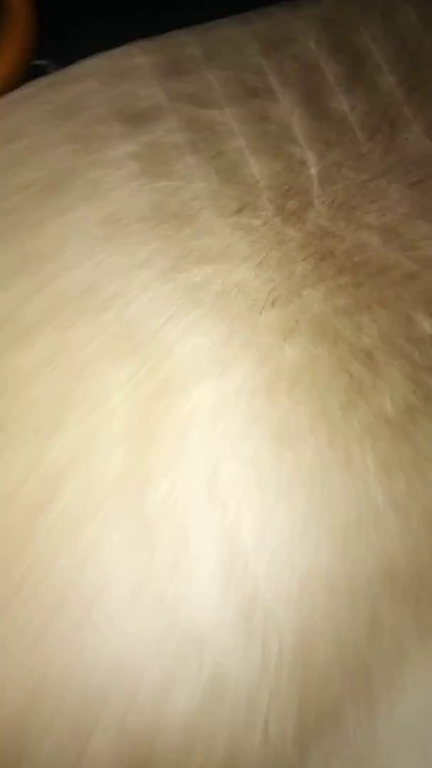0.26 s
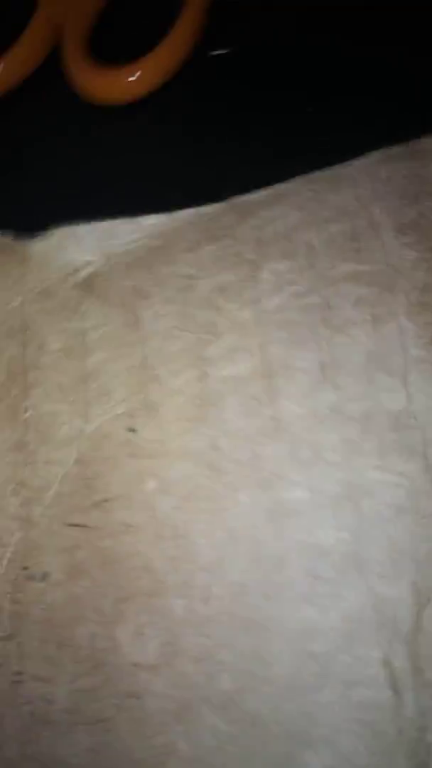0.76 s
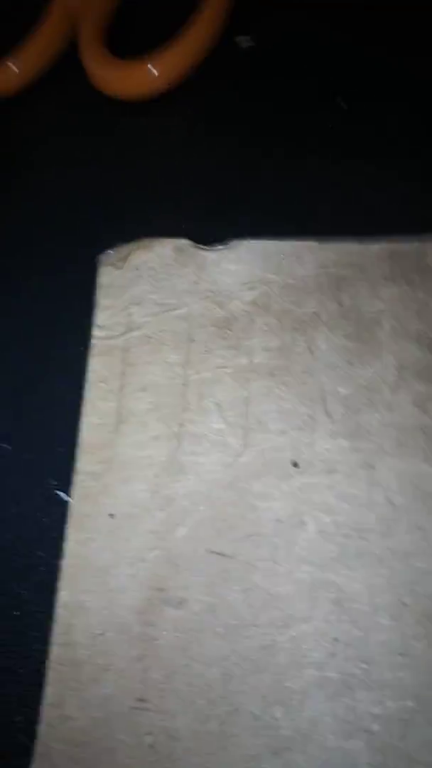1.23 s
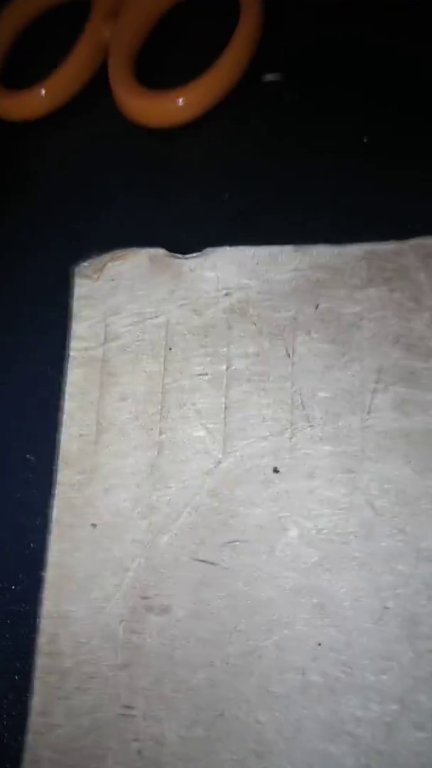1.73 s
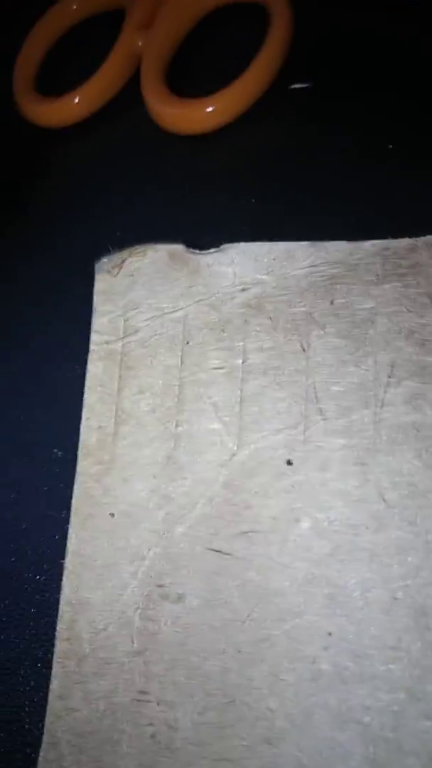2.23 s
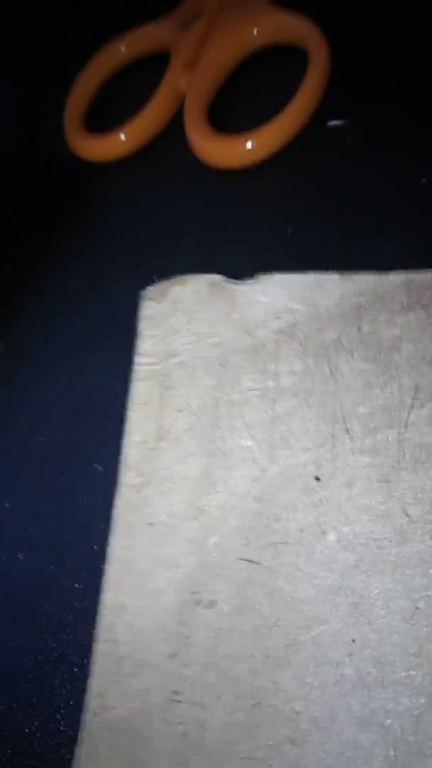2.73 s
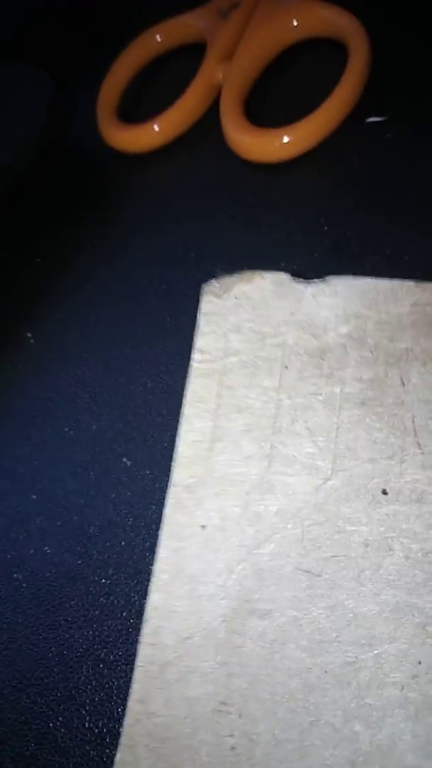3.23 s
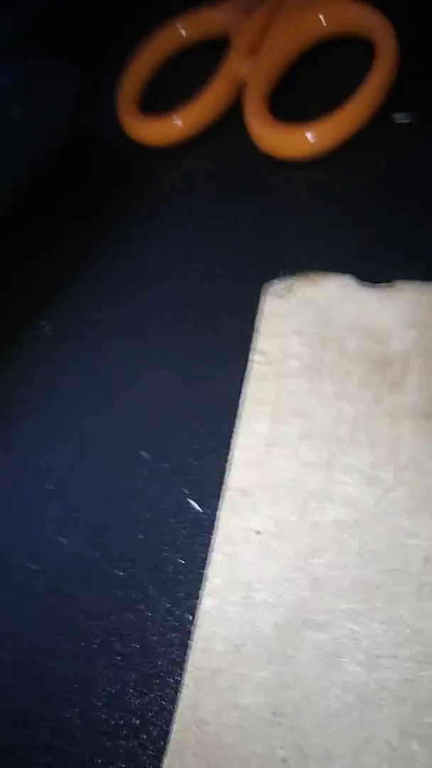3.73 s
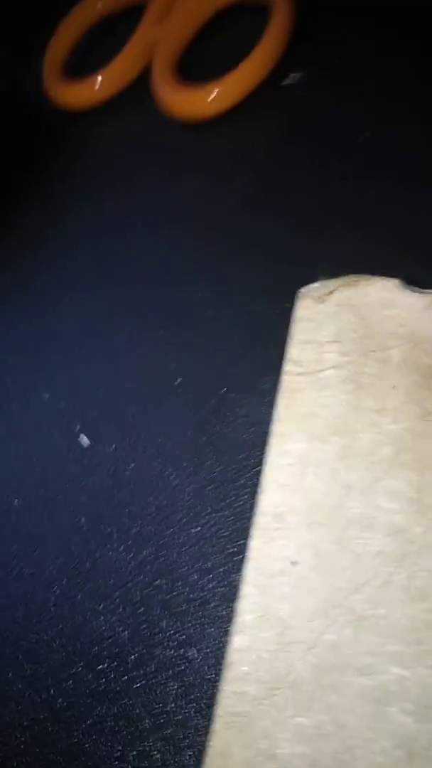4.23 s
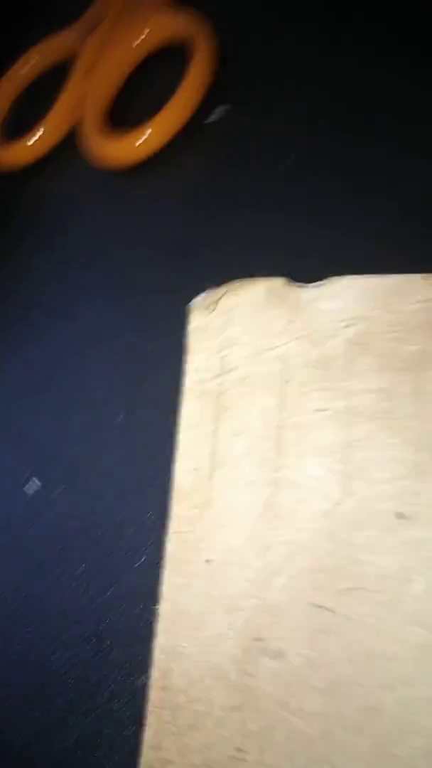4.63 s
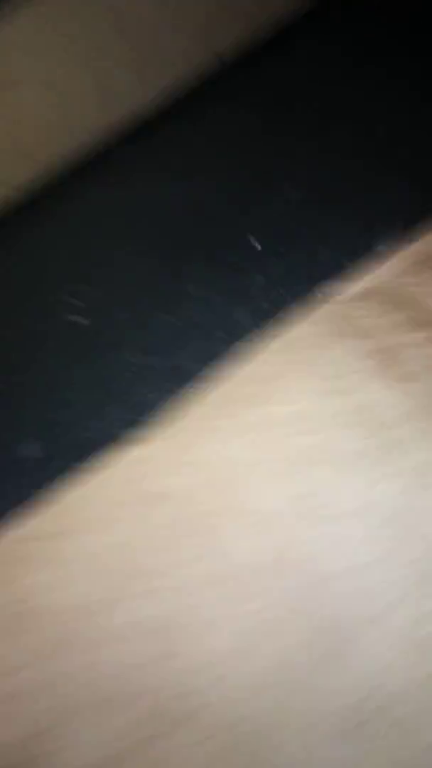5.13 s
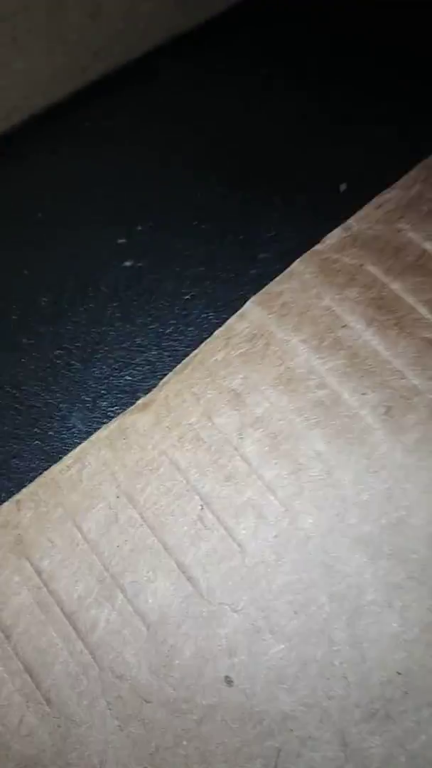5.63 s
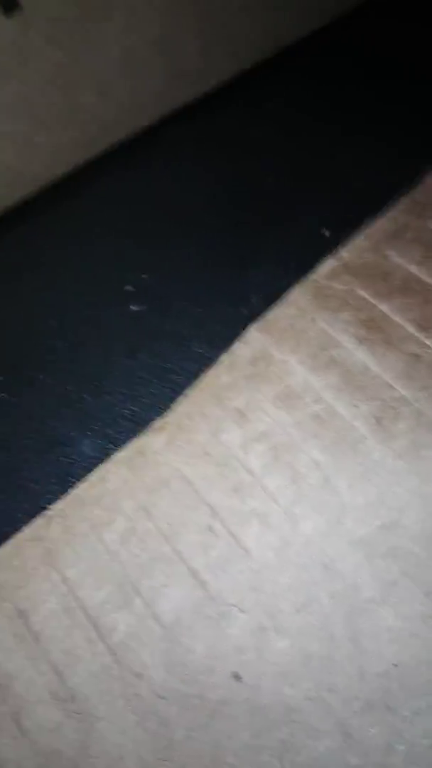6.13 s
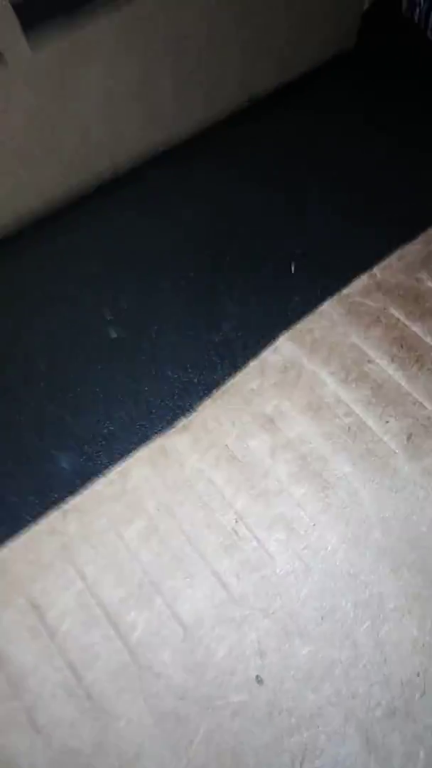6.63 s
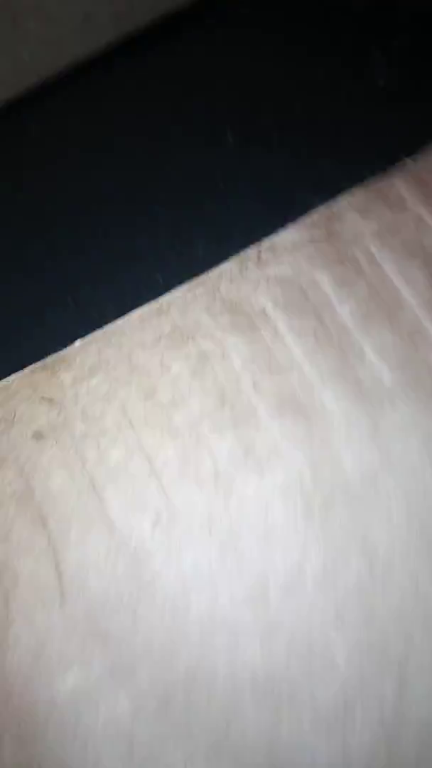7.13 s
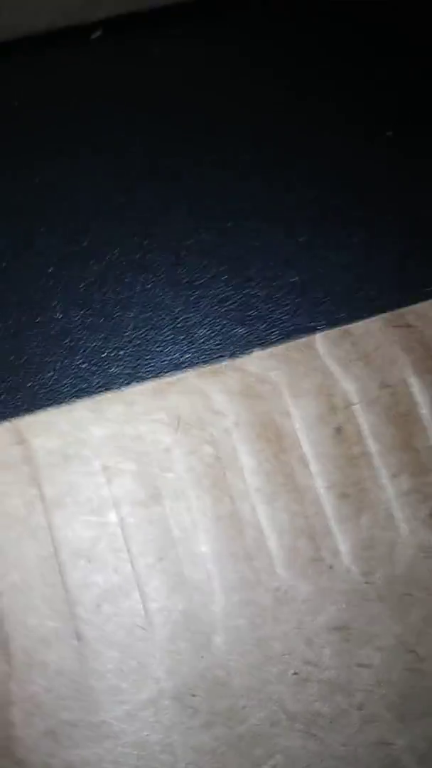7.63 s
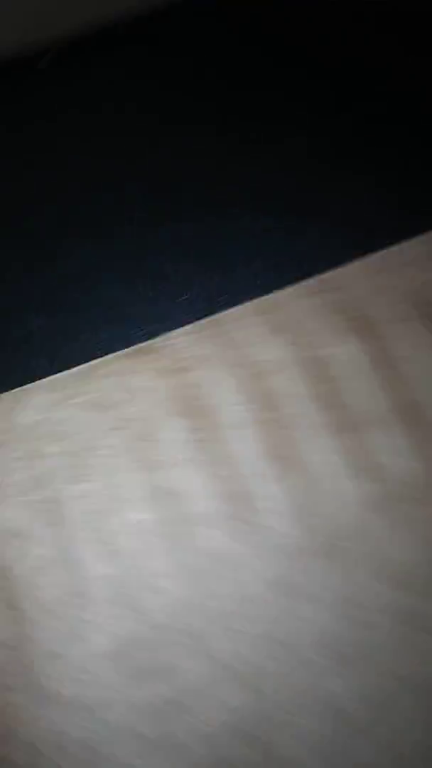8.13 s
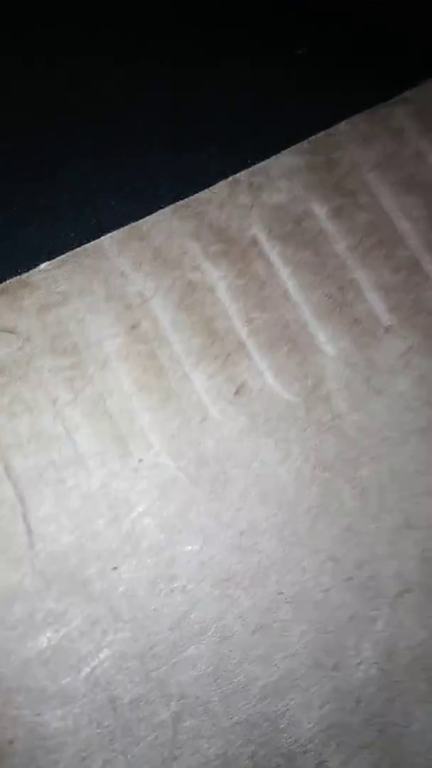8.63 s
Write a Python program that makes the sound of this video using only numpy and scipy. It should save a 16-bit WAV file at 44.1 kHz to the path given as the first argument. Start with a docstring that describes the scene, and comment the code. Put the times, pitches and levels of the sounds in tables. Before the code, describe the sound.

Hands tear and handle a paper envelope at close range, with crackling, rustling swishes and sharp crease snaps.

```python
"""A brown paper envelope, handled close to the microphone in a quiet room. It is picked up, torn (0.7 s),
rubbed hard twice, scuffed and scraped; it slides, its open pocket ringing hollow (3 s), is turned over
(4.4 s), swishes three times (5.7 s) and rests in the fingers (6.5 s). Throughout, fibres and creases slip
in showers of tiny clicks that the sheet colours, and single creases snap over and ring at their own pitch.
The loudest moments overload the recorder."""
import sys
import numpy as np
from scipy import signal
from scipy.fft import rfft, irfft
from scipy.io import wavfile
from scipy.ndimage import uniform_filter1d, map_coordinates

SR = 44100
rng = np.random.default_rng(int(sys.argv[2]) if len(sys.argv) > 2 else 0)


def transcribe(u):
    """Save the signal u as a 16-bit wav file named by the first command-line argument.

    u: samples, shape (n,) or (channels, n), limited to [-1, 1]; the rate is SR.
    q: integer samples, one column per channel.
    """
    v = np.clip(np.atleast_2d(u).T, -1, 1)
    q = np.round(v * 32767).astype(np.int16)
    wavfile.write(sys.argv[1], SR, q)


N = 391147

# hand strokes: (full strength from [s], rise [s], hold [s], fall [s], crackle [dB], rustle [dB], flap [dB])
HAND_STROKES = [(0.101, 0.0056, 0.027, 0.0057, -42, -40.5, -43),
                (0.167, 0.0067, 0.045, 0.0083, -72, -34.5, -45.5),
                (0.289, 0.027, 0.0054, 0.013, -41, -30.5, -31),
                (0.349, 0.037, 0.017, 0.045, -41.5, -38, -44),
                (0.554, 0.16, 0.024, 0.24, -36.5, -33, -39.5), (.818, 0.074, 0, 0.12, -31, -36.5, -36.5),
                (0.994, .13, .14, 0.047, -12, -24.5, -33.5), (1.267, 0.068, 0.17, 0.015, -11, -16, -23.5),
                (1.452, .03, 0.14, .03, -19, -25, -27), (1.533, 0.0087, 0.038, 0.038, -10, -12.5, -23.5),
                (1.588, 0.02, 0.061, 0.06, -6, -11.5, -21),
                (1.847, 0.024, 0.0075, 0.064, -34.5, -26.5, -25), (1.913, 0.024, 0, 0.054, -39, -39, -27),
                (2.094, 0.084, 0.04, 0.077, -43, -35, -34), (2.161, 0.012, 0.061, 0.029, -36.5, -20.5, -34),
                (2.315, 0.053, 0.077, 0.15, -28, -32.5, -33.5),
                (2.545, 0.026, 0.067, 0.018, -18.5, -24.5, -27.5),
                (2.707, 0.085, 0.044, 0.047, -15.5, -20, -28.5),
                (2.771, 0.0095, 0.12, 0.015, -11.5, -17, -28.5),
                (3.023, 0.09, 0.076, 0.23, -21.5, -20.5, -26.5),
                (3.246, 0.015, 0.35, 0.089, -23, -22.5, -33.5),
                (3.643, 0.031, 0.17, 0.099, -21, -22.5, -31),
                (3.895, 0.049, 0.0074, 0.02, -17.5, -21.5, -40),
                (3.955, 0.063, 0.046, 0.1, -21, -19.5, -26), (4.204, 0.21, 0, 0.067, -24, -24, -36),
                (4.319, 0.031, 0.0065, 0.049, -22, -27.5, -45),
                (4.565, 0.014, 0.023, 0.05, -37.5, -32, -23.5),
                (4.653, 0.057, 0.096, .09, -40.5, -33.5, -40), (4.875, 0.012, 0, 0.12, -45, -35, -35),
                (5.086, 0.0097, 0.063, 0.045, -40, -29, -35), (5.408, 0.12, 0.06, .2, -36.5, -35, -65),
                (5.597, 0.11, 0.024, 0.16, -31, -26, -31), (5.766, 0.046, 0, 0.34, -23.5, -17.5, -19.5),
                (5.919, 0.062, 0.046, 0.15, -19, -17.5, -24.5),
                (6.19, 0.1, 0.0039, 0.17, -13.5, -12, -16.5), (6.441, 0.05, 0.026, 0.051, -21.5, -17, -23),
                (6.635, 0.0071, 0.0024, 0.047, -39, -16, -13), (7.207, .004, 0.014, 0.025, -40, -24, -41),
                (7.71, 0.078, 0.00066, 0.074, -40, -35.5, -45), (7.561, 0.015, 0.022, 0.018, -47, -42, -60),
                (7.983, 0.031, 0.23, 0.45, -48.5, -44.5, -46), (8.271, 0.061, 0, 0.17, -36.5, -33.5, -36.5),
                (8.436, 0.045, 0.011, 0.019, -37, -32, -35), (8.676, 0.014, 0.042, 0.0067, -30.5, -36, -41),
                (8.771, 0.11, 0.021, 0.11, -33.5, -33.5, -46)]
# held sheet between strokes: (time [s], crackle [dB], rustle [dB], flap [dB])
HELD_LEVELS = [(0, -80, -81, -70), (.25, -77, -55, -49), (.42, -51, -63, -48), (1.2, -32, -33.5, -56),
               (1.72, -53, -33, -43), (1.8, -52, -51, -49), (2.63, -73.5, -39.5, -46),
               (2.9, -22.5, -25, -42), (3.9, -51, -30.5, -32), (4.4, -46, -45, -45.5),
               (5.3, -47.5, -40, -42), (6.58, -52.5, -41.5, -43.5), (6.69, -36, -29, -28),
               (6.9, -46.5, -39.5, -46.5), (7.28, -41, -35.5, -35.5), (7.52, -49.5, -46, -57),
               (7.9, -54.5, -48.5, -48), (8.87, -49, -42, -44.5)]
# slip coarseness: (time [s], spread of click sizes [dB])
SLIP_SPREAD = [(0, 3.5), (.7, 3), (1.1, 6), (1.3, 2), (2.3, 5), (2.8, 4), (3.5, 2.5), (5.7, 4.5),
               (6.7, 1.1), (8.87, 4)]
# colour of sheet and microphone per grip: (until [s], [(frequency [Hz], relative level [dB])])
GRIP_COLOURS = [(.72, [(60, -19), (290, 2), (600, -14), (1200, -13), (2600, -15), (5500, 1), (15600, -15)]),
                (1.2, [(60, -16), (320, 1), (700, -21.5), (1400, -17), (2300, -21), (4700, -5), (7800, 3),
                (10800, -11), (15600, -16.5)]), (1.75, [(60, -9), (206, 0.5), (476, -6), (1560, -8),
                (2600, -11), (6600, -3), (8720, -7.5), (12100, -20), (15600, -20)]), (2.27, [(60, -11),
                (300, -5), (700, -3.5), (1400, -7.5), (2400, -21), (7500, -21), (15600, -43)]),
                (2.948, [(60, -18.5), (292, -7.5), (535, -8), (1250, -4), (1830, -7), (2320, -7),
                (5000, -7.5), (7000, 0), (15600, -23)]), (3.72, [(60, -14.5), (200, -11), (1400, -4),
                (1900, -10), (3600, -11), (5600, -6.5), (6900, -2), (8500, -6.5), (10300, -15.5),
                (15600, -20.5)]), (4.4, [(60, -16.5), (248, -5), (465, -6), (758, -0.5), (3060, -5.5),
                (3600, -13), (6600, -8), (15600, -31)]), (5.7, [(60, -22.5), (216, -4.5), (560, -5.5),
                (1200, 4), (2010, -4), (7240, -6), (15600, -29.5)]), (6.549, [(60, -28.5), (192, -6.5),
                (344, -4), (420, -1.5), (1260, -2), (3690, -9.5), (6750, -6), (15600, -28)]),
                (9, [(60, -33), (115, -9), (300, -2.5), (700, -6.5), (1560, -5), (2850, -14.5), (3300, -10),
                (3950, -14.5), (4600, -13), (7000, -13.5), (9570, -22.5), (15600, -35)])]
# resonance of the open pocket: (time [s], pitch [Hz], lift [dB])
POCKET_RESONANCE = [(3.0, 2900, 6.5), (3.2, 2560, 6), (3.4, 2500, 8.5), (3.6, 2320, 3), (3.8, 2600, 0.5)]
# creases snapping over: (time [s], tick [dB], panel pitch [Hz], panel [dB])
CREASE_SNAPS = [(0.12, -42, 2440, -31), (0.173, -53, 1150, -24.5), (0.2, -62, 1270, -23),
                (0.2887, -37, 5230, -26), (0.48, -34, 3200, -25), (0.489, -18, 7100, -19),
                (0.624, -18.5, 4900, -27), (0.732, -18, 5540, -30.5), (0.769, -20, 7000, -25),
                (0.801, -15.5, 7200, -28.5), (0.819, -13, 298, -16.5), (0.865, -11.5, 4800, -18),
                (0.905, -14, 7500, -17), (0.941, -3.5, 1350, -16.5), (0.961, 8.5, 675, -7),
                (1.881, -21.5, 6800, -12.5), (1.896, -22, 2770, -23), (1.912, -19, 7220, -18),
                (2.093, -32, 2330, -30), (2.3123, -12, 6560, -4), (2.327, -8, 1550, -17),
                (2.3409, 6, 1320, 3.5), (2.3992, -10, 6700, -4.5), (2.4139, -20, 7200, -11.5),
                (2.544, -15, 6960, -14), (2.6577, -18, 7000, -0.5), (2.9281, -7, 1004, 2),
                (2.955, -7, 6700, -13), (3.0993, -38, 390, -9), (3.722, -28, 700, -7.5),
                (3.852, -25, 610, -13), (3.8878, -12, 790, -9), (3.9513, -11, 770, -7.5),
                (3.985, -19, 247, -9.5), (4.0445, -20, 704, -6.5), (4.431, -20, 1490, -26.5),
                (4.565, -2, 1470, -8.5), (4.6, -40, 280, -26), (4.76, -21, 300, -16),
                (4.864, -5.5, 1116, 1.5), (5.0573, -24, 1180, -20.5), (5.1353, -20.5, 1150, -19),
                (5.229, -23, 2990, -18), (5.238, -34, 190, -18.5), (5.301, -50, 240, -27.5),
                (5.425, -34, 276, -13.5), (5.4637, -11, 1260, 7.5), (5.547, -20, 1200, -18),
                (5.7599, -21, 450, -18), (5.9172, -13, 790, -3), (5.94, -3, 1280, -9),
                (6.0668, -25, 770, -0.5), (6.241, -10, 6000, -14), (6.576, -42, 1470, -22),
                (6.62, -11, 2060, -10.5), (6.641, -17, 302, 4), (6.6598, -19, 1040, -6),
                (6.892, -43, 227, -18.5), (7.078, -27, 1620, -28), (7.151, -24, 3420, -25),
                (7.21, -35, 302, -23), (7.254, -45, 348, -19), (7.305, -35, 1200, -26),
                (7.685, -23, 3280, -23), (7.7168, -21, 4400, -15), (7.872, -25, 7600, -20),
                (7.952, -11.5, 7220, -8.5), (8.109, -30, 830, -23.5), (8.1763, -18, 4540, -19),
                (8.194, -37, 500, -25.5), (8.4214, -22, 300, -22), (8.4373, -4, 286, -13),
                (8.465, -17.5, 1700, -17), (8.479, -19, 450, -16.5), (8.5514, -32, 5060, -18),
                (8.581, -14, 4560, -9.5), (8.7035, -11, 5060, -12)]
# room noise: (frequency [Hz], relative level [dB])
ROOM_SPECTRUM = [(40, -4), (273, 2), (7560, -18), (15600, -23)]

SLIPS_PER_S = 1500
FIBRE_LOW_HZ, FIBRE_TOP_HZ, FIBRE_T60_CYCLES, FIBRE_RUB = 3320, 13500, 5.2, 1.31
FLAP_TOP_HZ, RUSTLE_TOP_HZ = 550, 2890
STROKE_DEPTH_DB = 20  # drop per rise or fall time
BEND_DB, BEND_S, BEND_WIDTH_HZ, POCKET_WIDTH_HZ = 3.5, .15, 264.4, 380
TICK_T60_S, TICK_LOW_HZ, THUD_GAIN, THUD_TOP_HZ = .013, 1390, .35, 924
PANEL_MAX_T60_S, PANEL_MAX_CYCLES, RATTLE_T60_S, RATTLE_BAND_RATIO = .025, 51, .39, 1.42
ROOM_DB, MIC_LOW_HZ, CLIP_LEVEL, TOP_HZ = -53.5, 75, .75, 15700


def crinkle():
    """One shower of slips makes fibres crackle, panels rustle, the sheet flap; larger parts ring longer."""
    crackle, rustle, flap = hand_gains()
    spread_db, = curves(SLIP_SPREAD)
    sizes = np.minimum(rng.exponential(size=N), 3.2) + .5 * walk(90)
    slips = (rng.random(N) < SLIPS_PER_S / SR) * undb(spread_db * sizes)
    finger_pressure = undb(1.5 * walk(11))
    out = sheet_colour(crackle * fibres(slips, spread_db), RUSTLE_TOP_HZ, SR)
    for gain, lo_hz, hi_hz, t60_s, skin_rub, flicker_db in (
            (rustle, FLAP_TOP_HZ, RUSTLE_TOP_HZ, .015, .6, 1.2), (flap, 0, FLAP_TOP_HZ, .04, .35, 2.0)):
        bursts = even_out(decay(slips, t60_s))
        strength = (bursts + skin_rub) * finger_pressure * undb(flicker_db * walk(30))
        shake = unit(strength * rng.standard_normal(N))
        out += sheet_colour(gain * shake, lo_hz, hi_hz)
    return out


def fibres(slips, spread_db):
    """Each slip plucks one of six fibres over the rub of skin; coarse slips leave less rub."""
    pitches_hz = np.geomspace(FIBRE_LOW_HZ, FIBRE_TOP_HZ, num=6)
    plucked = rng.integers(len(pitches_hz), size=N)
    rings = np.zeros(N)
    for k, hz in enumerate(pitches_hz):
        pole = 1000 ** (-hz / (FIBRE_T60_CYCLES * SR)) * np.exp(2j * np.pi * hz / SR)
        rings += hz * signal.lfilter([1], [1, -pole], slips * (plucked == k)).real
    skin_rub = FIBRE_RUB * undb(.59 * walk(30) - 1.5 * spread_db) * rng.standard_normal(N)
    return unit(even_out(rings) + skin_rub)


def hand_gains():
    """Crackle, rustle and flap gains: strokes swell, hold and die over the held sheet, adding as powers."""
    t = np.arange(N) / SR
    power = undb(curves(HELD_LEVELS) + 1.6 * walk(24)) ** 2  # the grip shifts in fits
    for at_s, rise_s, hold_s, fall_s, *levels_db in HAND_STROKES:
        near = (t > at_s - 3 * rise_s) & (t < at_s + hold_s + 3 * fall_s)
        age_s = t[near] - at_s
        away = np.maximum(-age_s / rise_s, 0) + np.maximum((age_s - hold_s) / fall_s, 0)
        power[:, near] += np.outer(undb(levels_db) ** 2, undb(-STROKE_DEPTH_DB * away) ** 2)
    return np.sqrt(power)


def sheet_colour(x, lo_hz, hi_hz):
    """Each grip filters the sound its own way; grips cross-fade over 50 ms."""
    out, start_s, t = np.zeros(2 * N), -1, np.arange(N) / SR
    for end_s, spectrum in GRIP_COLOURS:
        share = np.clip((t - start_s) * 20 + .5, 0, 1) - np.clip((t - end_s) * 20 + .5, 0, 1)
        held = np.flatnonzero(share > 0)
        coloured = signal.oaconvolve(np.sqrt(share[held]) * x[held], response(spectrum, lo_hz, hi_hz))
        out[held[0]:held[0] + len(coloured)] += coloured
        start_s = end_s
    return out[:N]


def bending(x):
    """Small resonances come, drift and go as the sheet bends; the pocket adds its own."""
    f, t, spectra = signal.stft(x, SR, nperseg=512)
    patches = rng.standard_normal((200, 300))
    grid = np.meshgrid(f / BEND_WIDTH_HZ, t / BEND_S, indexing="ij")
    gain = unit(undb(BEND_DB * map_coordinates(patches, grid, order=1)))
    times_s, pocket_hz, lift_db = np.transpose(POCKET_RESONANCE)
    peak = np.exp(-((f[:, None] - np.interp(t, times_s, pocket_hz)) / POCKET_WIDTH_HZ) ** 2)
    gain *= undb(np.interp(t, times_s, lift_db, left=0, right=0) * peak)
    return signal.istft(spectra * gain, SR, nperseg=512)[1][:N]


def crease_snaps():
    """A bright tick; the freed panel rings and rattles near its pitch; the jolt thuds through the sheet."""
    t = np.arange(int(.2 * SR)) / SR
    ticks, panels, thuds = np.zeros((3, N + len(t)))
    noises = rng.standard_normal((len(CREASE_SNAPS), 2, len(t)))
    for (at_s, tick_db, hz, panel_db), (grit, jolt) in zip(CREASE_SNAPS, noises):
        span = slice(int(at_s * SR), int(at_s * SR) + len(t))
        ticks[span] += undb(tick_db) * np.sign(grit) * np.minimum(t / .0004, 1) * 1000 ** (-t / TICK_T60_S)
        size = min(PANEL_MAX_CYCLES / hz / PANEL_MAX_T60_S, 1)  # small, high panels die sooner
        dying = 1000 ** (-t / (PANEL_MAX_T60_S * size))
        ring = -np.sin(2 * np.pi * hz * t) * np.minimum(t / (.00081 * size), 1) * dying
        band = signal.butter(2, [hz / RATTLE_BAND_RATIO, hz * RATTLE_BAND_RATIO], "bandpass", fs=SR)
        rattle_gain = .52 * dying + .034 * size * 1000 ** (-t / RATTLE_T60_S)
        rattle = rattle_gain * unit(signal.lfilter(*band, jolt))
        panels[span] += undb(panel_db) * (ring + rattle)
        thuds[span] += undb(panel_db) * THUD_GAIN * size * jolt * 1000 ** (-t / PANEL_MAX_T60_S)
    return sheet_colour(ticks[:N], TICK_LOW_HZ, SR) + panels[:N] + sheet_colour(thuds[:N], 0, THUD_TOP_HZ)


def room():
    """Faint, steady, dark noise."""
    return undb(ROOM_DB) * signal.oaconvolve(rng.standard_normal(N), response(ROOM_SPECTRUM))[:N]


def undb(db):
    """dB to gain."""
    return 10 ** (np.asarray(db) / 20)


def unit(x):
    """Scale to rms 1."""
    return x / np.sqrt(np.mean(x ** 2))


def even_out(x):
    """Divide by the running rms over 1/12 s."""
    return x / np.sqrt(uniform_filter1d(x ** 2, size=SR // 12))


def curves(table):
    """Table columns, interpolated per sample."""
    times_s, *columns = np.transpose(table)
    return [np.interp(np.arange(N) / SR, times_s, column) for column in columns]


def response(spectrum, lo_hz=0, hi_hz=SR, size=2048):
    """Minimum-phase impulse response of (Hz, dB) points between two band edges, energy 1."""
    f = np.maximum(np.arange(size + 1) * SR / (2 * size), 10)
    hz, db = np.transpose(spectrum)
    edge_loss = np.sqrt((1 + (lo_hz / f) ** 10) * (1 + (f / hi_hz) ** 10))
    gain = undb(np.interp(np.log(f), np.log(hz), db)) / edge_loss
    cepstrum = irfft(np.log(gain))
    cepstrum[1:size] *= 2
    cepstrum[size + 1:] = 0
    impulse = irfft(np.exp(rfft(cepstrum)))[:size]
    return impulse / np.sqrt(np.sum(impulse ** 2))


def walk(rate_hz):
    """Slewed random steps, rms 1."""
    hold = int(SR / rate_hz)
    steps = np.repeat(rng.standard_normal(N // hold + 1), hold)
    return unit(uniform_filter1d(steps, hold)[:N])


def decay(x, t60_s):
    """Give each impulse an exponential tail."""
    return signal.lfilter([1], [1, -1000 ** (-1 / (t60_s * SR))], x)


def scene():
    """The handled envelope over the quiet room, mono."""
    background = room()
    return (bending(crinkle()) + crease_snaps() + background)[None]


def record(dry):
    """The microphone loses the deep bass, the converter clips flat, then the top is cut."""
    low_cut = signal.butter(4, MIC_LOW_HZ, "highpass", fs=SR, output="sos")
    top_cut = signal.ellip(14, .2, 100, TOP_HZ, fs=SR, output="sos")
    clipped = np.clip(signal.sosfilt(low_cut, dry), -CLIP_LEVEL, CLIP_LEVEL)
    return signal.sosfilt(top_cut, clipped)


dry = scene()
out = record(dry)
transcribe(out)
```